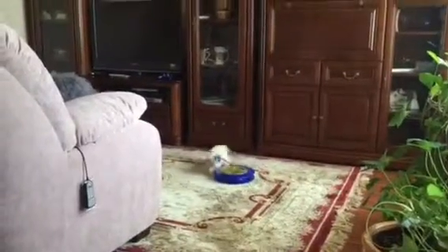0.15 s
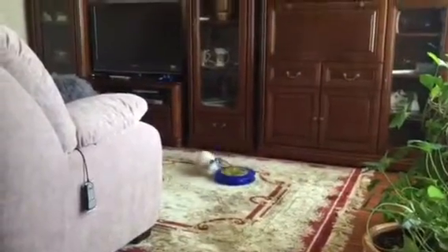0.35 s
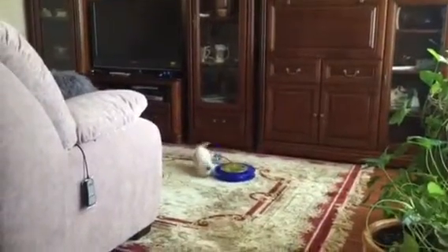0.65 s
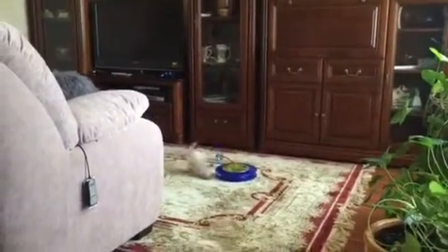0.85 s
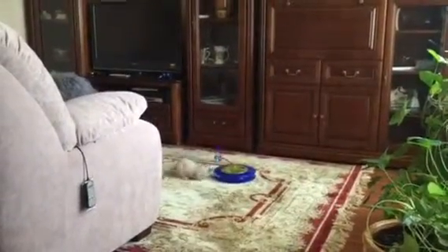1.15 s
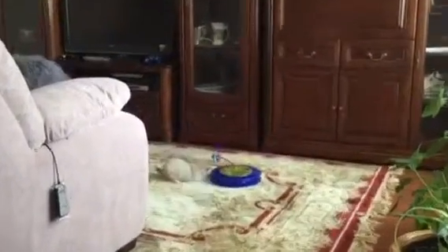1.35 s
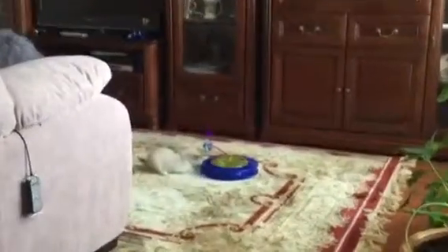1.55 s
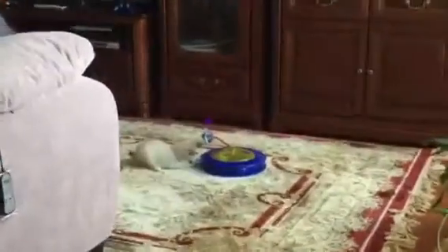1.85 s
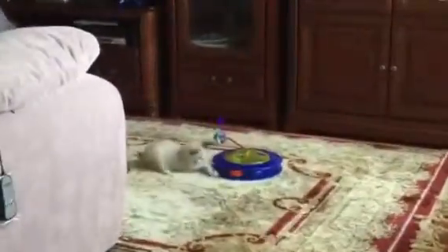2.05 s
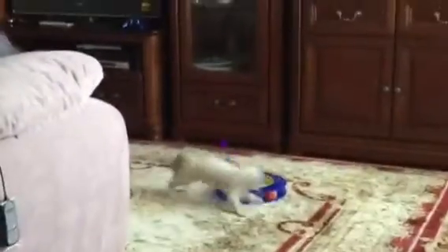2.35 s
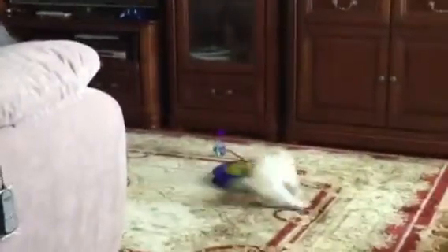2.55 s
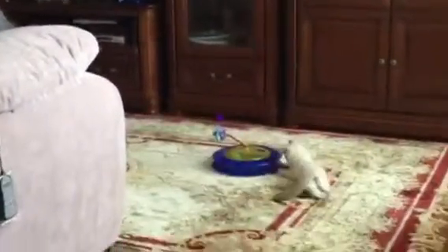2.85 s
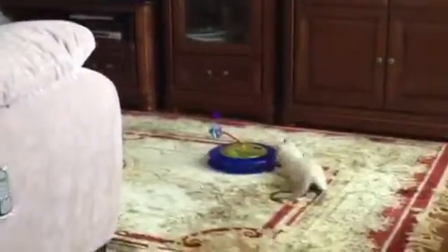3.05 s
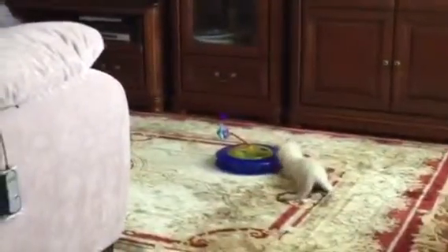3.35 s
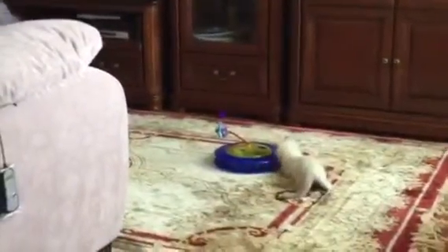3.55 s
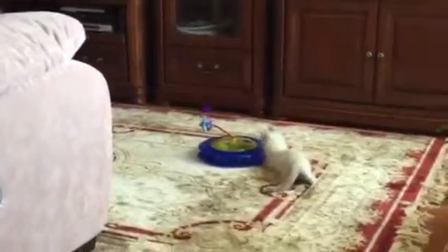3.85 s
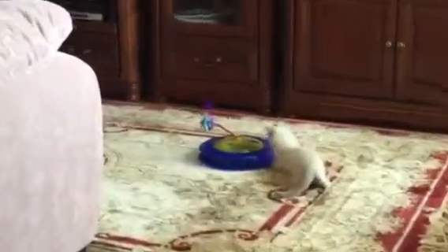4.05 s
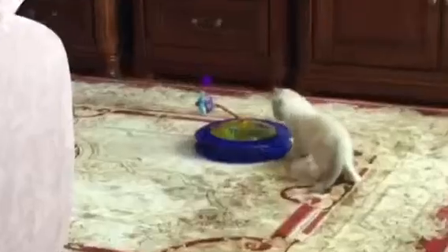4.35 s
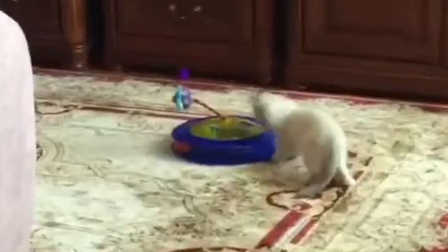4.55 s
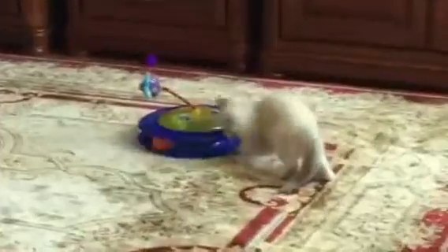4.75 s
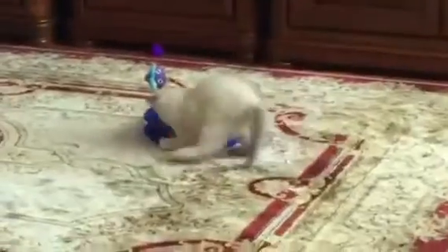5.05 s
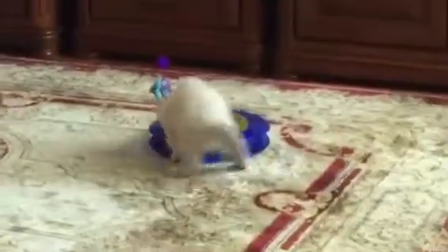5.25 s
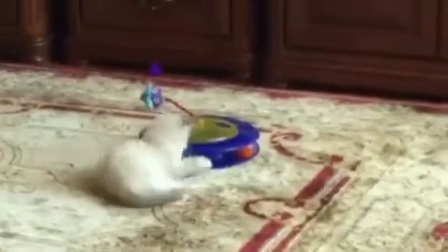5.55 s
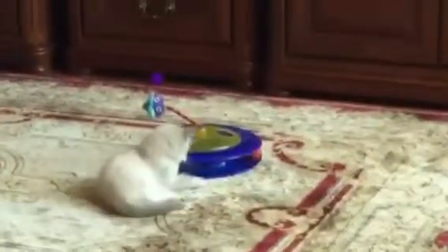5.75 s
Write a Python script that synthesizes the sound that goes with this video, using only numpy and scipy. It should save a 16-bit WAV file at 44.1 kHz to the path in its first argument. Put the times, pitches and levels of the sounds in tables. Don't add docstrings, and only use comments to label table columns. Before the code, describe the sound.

A kitten bats a hollow plastic ball-track toy on a rug in a furnished living room, heard from a few metres away on a phone. Faint rolling and rubbing open the scene, then a claw tick and the loudest, ringing clack at about 0.3 s. A soft bump and scuff follow at 0.7-0.8 s, a clear hollow knock at 1.5 s, a weaker one at 1.9 s, and a small cluster around 2.15 s. Light rolling leads to a strong, lower knock with a thud and short rough scrape at 2.85 s. Claw clicks and a small knock come near 3.4 s, then quiet ball taps and rolling until a modest knock at 5.1 s. A denser clatter with dragging runs from 5.45 to 5.7 s, then fades. Each blow is short and dry-plastic, with about a third of a second of room ring over low hum and soft hiss.

```python
import sys
import numpy as np
from scipy import signal
from scipy.fft import rfft, irfft, next_fast_len
from scipy.io import wavfile
from scipy.ndimage import uniform_filter1d

SR = 44100
rng = np.random.default_rng(int(sys.argv[2]) if len(sys.argv) > 2 else 0)


def store_pcm(level_fs):
    pcm = np.round(np.clip(level_fs, -1, 1) * 32767).astype(np.int16)
    wavfile.write(sys.argv[1], SR, np.atleast_2d(pcm).T)


def undo_db(level):
    steps = np.asarray(level, float) / 20
    return 10 ** steps


N = 259749

# mode_hz [Hz], level_db [dB], t60_s [s]
BODY = [(558.6, -0.5, 0.073), (642.8, 1.5, 0.043), (685, 1, 0.028), (843, -1, 0.03), (937, 0, 0.042),
        (1050, 1, 0.044), (1140, -6, 0.036)]
# mode_hz [Hz], level_db [dB], t60_s [s]
WALL = [(1249, -9.5, 0.091), (1379, 0, 0.018), (1634, -4, 0.017), (1861, -9.5, 0.057), (1947, -4.5, 0.024),
        (2052, -1.5, 0.011)]
# mode_hz [Hz], level_db [dB], t60_s [s]
SHELL = [(2413, 2.5, 0.029), (2640, -1, 0.035), (2934, -6, 0.026), (3120, -3, 0.052), (3437, -3, 0.084),
         (4054, 1.5, 0.0074), (4050, -2, 0.012), (4350, -9.5, 0.0042)]


def level(x, db):
    return x * undo_db(db) / np.sqrt(np.mean(x ** 2))


def shaped(gain_of_hz, size=N):
    fast = next_fast_len(size)
    hz = np.arange(fast // 2 + 1) * SR / fast + 1e-3
    spectrum = rfft(rng.standard_normal(fast)) * gain_of_hz(hz)
    return irfft(spectrum, fast)[:size]


def walk(rate_hz):
    hold = int(SR / rate_hz)
    steps = np.repeat(rng.standard_normal(N // 50)[:N // hold + 1], hold)
    return 1.3 * uniform_filter1d(uniform_filter1d(steps, hold), hold)[:N]


def add(out, start_s, y):
    i = int(start_s * SR)
    out[i:i + len(y)] += y[:N - i]


def push(db):
    return 0.0002 * undo_db(-0.3 * (db + 14.5))


def ring(modes, chance, scatter_db, detune, push_s, lean_hz=1000, lean_db=0):
    hz, db, t60 = np.transpose(modes)[:, :, None]
    size, pitch = chance[:len(hz), None], chance[-len(hz):, None]
    octaves_away = np.minimum(abs(np.log2(hz / lean_hz)), 0.7)
    db = db + scatter_db * size - lean_db * octaves_away
    t = np.arange(SR // 12) / SR
    sign = (-1) ** np.arange(len(hz))[:, None]
    decay = np.exp(-np.log(1000) * t / t60)
    tones = np.sin(2 * np.pi * hz * (1 + detune * pitch) * t)
    y = (sign * undo_db(db) * decay * tones).sum(0)
    y *= 1 - np.exp(-(t / push_s) ** 2)
    return y / abs(y).max()


def crack(noise, hz, width, t60, snap):
    edges = np.clip([hz / (1 + width), hz * (1 + width)], 1000, 15000)
    burst = noise * np.exp(-np.log(1000) * np.arange(len(noise)) / SR / t60)
    burst[0] = snap
    y = signal.sosfilt(signal.butter(3, edges, "bandpass", fs=SR, output="sos"), burst)
    return y / abs(y).max()


def spell(start_s, length_s):
    fade_in_s, fade_out_s = 0.012, 0.04
    t = np.arange(N) / SR - start_s
    share = np.clip(t / length_s, 0, 1)
    edges = np.minimum(t / fade_in_s + 0.5, (length_s - t) / fade_out_s + 0.5)
    return share, np.clip(edges, 0, 1) ** 2


def air():
    # freq_hz [Hz], density_db [dB per Hz]
    hiss_curve = [(18, -43.5), (30, -12), (102, -3), (167, -4.5), (213, -6), (467, -12.5), (1370, -22.5),
                  (1510, -25.5), (2130, -23.5), (9290, -33), (10500, -31), (13600, -66), (22000, -120)]
    # centre_hz [Hz], width_hz [Hz], level_db [dB]
    hum_bands = [(49.8, 17, -73), (98.8, 23, -70), (130.6, 19, -69.5), (215, 6.2, -74),
                 (283.4, 13.4, -78.5), (1497, 44, -83.5)]
    hz, db = np.transpose(hiss_curve)
    wide = level(shaped(lambda h: undo_db(np.interp(np.log(h), np.log(hz), db))), -65.0)
    out = wide * undo_db(0.6 * walk(2.15))
    for centre_hz, width_hz, level_db in hum_bands:
        hum = shaped(lambda h: 1 / (1 + ((h - centre_hz) / width_hz * 2) ** 2))
        out += level(hum, level_db) * undo_db(2.0 * walk(4.7))
    return out


def room():
    # freq_hz [Hz], t60_s [s]
    decay_times = [(200, 0.43), (500, 0.28), (1000, 0.31), (2800, 0.32), (7000, 0.28), (10000, 0.26)]
    # delay_s [s], level_db [dB]
    bounces = [(.0024, -12), (.0083, -5.5), (.0115, -12.5), (0.015, -13), (0.02, -15)]
    tail_db, tail_rise_s = -27.5, 0.0019
    near_db, near_s = 1.5, 0.023
    size = SR // 2
    t = np.arange(size) / SR
    hz, t60 = np.transpose(decay_times)
    tail = np.zeros(size)
    for f in 100 * 2 ** np.arange(0, 7.5, 0.5):
        band = shaped(lambda h: np.cos(np.pi * np.clip(np.log2(h / f), -0.5, 0.5)), size)
        tail += band * np.exp(-np.log(1000) * t / np.interp(np.log(f), np.log(hz), t60))
    answer = undo_db(tail_db) * tail * (1 - np.exp(-(t / tail_rise_s) ** 2))
    answer *= undo_db(near_db * np.exp(-(t / near_s) ** 4))
    answer[0] = 1
    for delay_s, level_db in bounces:
        answer[int(delay_s * SR)] += undo_db(level_db)
    return answer


def drags():
    # start_s [s], length_s [s], hiss_db [dB], rumble_db [dB]
    slides = [(0.005, 0.079, -64.5, -51), (0.147, 0.13, -61, -60), (0.716, 0.04, -65, -60),
              (0.782, 0.079, -54.5, -49.5), (2.113, 0.044, -65.5, -51), (2.266, 0.081, -60, -49.5),
              (2.345, 0.34, -64, -67), (2.72, 0.17, -63, -62), (2.864, 0.062, -40, -45),
              (3.386, 0.1, -52, -58), (3.59, .11, -72, -60), (3.8, 0.355, -86, -67), (4.478, .09, -82, -63),
              (5.019, 0.066, -68, -52.5), (5.452, 0.12, -43.5, -54), (5.58, 0.068, -50, -47),
              (5.646, 0.092, -79, -53.5), (5.82, 0.12, -82, -76)]
    hiss_gain, rumble_gain = np.zeros(N), np.zeros(N)
    for start_s, length_s, hiss_db, rumble_db in slides:
        _, gate = spell(start_s, length_s)
        hiss_gain += gate * undo_db(hiss_db)
        rumble_gain += gate * undo_db(rumble_db)
    hiss = shaped(lambda hz: 1 / (1 + (2500 / hz) ** 4) / (1 + hz / 6000)) * undo_db(2.5 * walk(60))
    rumble = shaped(lambda hz: 1 / (1 + ((hz - 240) / 90) ** 2)) * undo_db(3.9 * walk(25))
    return hiss_gain * level(hiss, -17.5) + rumble_gain * level(rumble, -6.5)


def rolls():
    # start_s [s], length_s [s], push_db [dB], change_db [dB gained or lost by the end]
    runs = [(0.005, 0.098, -45.5, -36), (0.15, 0.21, -64.5, 12), (0.722, .04, -55.5, -2),
            (0.782, 0.093, -57.5, -2), (2.118, 0.048, -53.5, 20.5), (2.306, .32, -65.5, 3.5),
            (2.616, 0.069, -56, -20), (2.74, 0.15, -65.5, 23), (2.885, 0.092, -38, -40),
            (3.52, .17, -70.5, 22), (3.7, .16, -68.5, -1), (3.965, 0.33, -69, -5), (4.41, 0.21, -68.5, 1),
            (4.66, 0.25, -59.5, -25), (5.008, .08, -52, -3), (5.482, 0.14, -37.5, -34),
            (5.58, 0.12, -49, -19), (5.824, 0.098, -61, -5)]
    spots_hz = [850, 960, 1120, 1300, 1600]
    gain = np.zeros(N)
    for start_s, length_s, push_db, change_db in runs:
        share, gate = spell(start_s, length_s)
        gain += gate * undo_db(push_db + change_db * share)
    bumps = (rng.random(N) < 260 / SR) * undo_db(1.1 * rng.exponential(size=N)) * rng.standard_normal(N)
    place = rng.integers(len(spots_hz), size=N)
    roll = np.zeros(N)
    for k, hz in enumerate(spots_hz):
        bump_ring = ring([*BODY, *WALL], rng.standard_normal(32), 0.75, 0.016, 0.00015, hz, 31.0)
        roll += signal.fftconvolve(bumps * (place == k), bump_ring)[:N]
    return gain * level(roll, -5.0)


def thumps():
    # start_s [s], peak_db [dB], favoured_hz [Hz]
    landings = [(0.282, -34.5, 363), (0.734, -49.5, 363), (0.793, -42, 197), (0.845, -55, 215),
                (1.512, -38.5, 383), (1.911, -45, 369.3), (2.149, -41.5, 337), (2.838, -32, 270),
                (2.891, -44.5, 215), (3.437, -44, 420), (3.666, -52, 278), (4.763, -63, 352),
                (5.097, -46.5, 363), (5.47, -38, 354), (5.516, -40, 446), (5.593, -42.5, 198),
                (5.631, -43, 215), (5.701, -61, 226)]
    # mode_hz [Hz], level_db [dB], t60_s [s]
    thud_modes = [(209.4, -4.5, 0.14), (303, -1, 0.07), (360, -6.5, 0.023), (405.5, 5, 0.028)]
    out = np.zeros(N)
    for start_s, peak_db, hz in landings:
        thud = ring(thud_modes, rng.standard_normal(16), 0.64, 0.02, 0.0039, hz, 28.0)
        add(out, start_s, undo_db(peak_db - 2.5) * thud)
    return out


def ticks():
    # start_s [s], peak_db [dB], centre_hz [Hz]
    claws = [(0.0817, -56, 7430), (0.2586, -27.5, 7500), (1.471, -37, 7200), (1.8536, -54, 8420),
             (2.045, -45, 9100), (2.5476, -55, 9600), (2.814, -41, 7950), (3.3386, -38, 8500),
             (3.3852, -30, 5200), (4.6467, -50, 7740), (5.5447, -38.5, 6300)]
    out = np.zeros(N)
    for start_s, peak_db, hz in claws:
        add(out, start_s, undo_db(peak_db - 1.0) * crack(rng.standard_normal(512), hz, 0.34, 0.017, 12.0))
    return out


def pings():
    # start_s [s], peak_db [dB], panel_hz [Hz]
    panel_blows = [(0.278, -20, 1660), (0.278, -36, 3060), (1.513, -34, 3150), (1.912, -51, 3720),
                   (2.174, -70, 3530), (2.357, -67, 3550), (2.5, -56, 1600), (2.628, -79, 2420),
                   (2.841, -33, 2540), (2.841, -29, 1480), (2.927, -52.5, 3500), (3.386, -39, 2970),
                   (3.44, -62, 1810), (5.101, -57, 2640), (5.101, -56.5, 3080), (5.101, -48.5, 1760),
                   (5.321, -61, 1620), (5.464, -32.5, 632), (5.464, -46, 3508), (5.543, -49, 2380),
                   (3.386, -44.5, 2080), (0.278, -24, 816), (0.315, -30, 937), (0.197, -54.5, 1140),
                   (0.278, -32, 2052), (5.464, -37.5, 937)]
    out = np.zeros(N)
    for start_s, peak_db, hz in panel_blows:
        chance = rng.standard_normal(44)
        ping = ring([*BODY, *WALL, *SHELL], chance, 1.16, 0.0097, 0.87 * push(peak_db), hz, 78.0)
        add(out, start_s + 0.00033, undo_db(peak_db) * ping)
    return out


def knocks():
    # start_s [s], peak_db [dB], favoured_hz [Hz], hard_db [dB rel], wall_db [dB rel]
    swats = [(0.278, -19.5, 850, -10.5, -9), (0.736, -40, 680, -25.5, -12.5),
             (1.513, -21.5, 880, -18.5, -9.5), (1.912, -30.5, 870, -17.5, -10.5),
             (2.139, -37.5, 1090, -20.5, -8.5), (2.153, -46.5, 1060, -12.5, -8),
             (2.174, -33, 960, -22.5, -7.5), (2.839, -21, 616, -16.5, -22), (2.884, -44.5, 660, -6, 9.5),
             (2.927, -33.5, 1020, -16.5, -8), (3.384, -46.5, 724, 4.5, 1.5), (3.436, -39, 730, -26, -6.5),
             (5.101, -32.5, 960, -35.5, -20), (5.464, -28, 930, -16.5, -5), (5.509, -29.5, 540, -24, -10),
             (5.543, -47, 961, -8.5, -17), (5.586, -39.5, 876, -8.5, 2), (5.599, -41.5, 540, -28, -7),
             (5.623, -34, 860, -18, -6), (5.677, -55, 844, -28, -9), (5.705, -48.5, 1010, -13, -4.5)]
    # start_s [s], peak_db [dB], favoured_hz [Hz], hard_db [dB rel]
    taps = [(0.041, -49, 1140, -33.5), (0.094, -49, 1140, -22.5), (0.162, -51.5, 760, -22),
            (0.195, -53, 1140, -18), (0.67, -51, 570, -52), (2.225, -40, 1050, -52),
            (2.313, -52, 1050, -44), (2.356, -43, 1100, -22.5), (2.628, -45, 930, -23),
            (2.797, -58, 1140, -10), (3.338, -52, 1120, -16), (3.609, -47.5, 1050, -26),
            (3.659, -39.5, 1145, -27), (3.833, -62, 1044, -33), (4.015, -53.5, 1083, -32),
            (4.088, -44.5, 1170, -59), (4.149, -49.5, 1050, -36), (4.505, -62, 1140, -27),
            (4.573, -63.5, 1140, -18), (4.647, -41, 875, -28), (4.839, -59.5, 544, -30),
            (4.923, -54, 550, -23), (5.017, -42, 870, -41), (5.319, -44, 840, -27), (5.87, -52, 830, -22)]
    blows = [*swats, *[(*tap, -9 + 0.13 * (tap[3] + 24)) for tap in taps]]
    out = np.zeros(N)
    for start_s, peak_db, hz, hard_db, wall_db in blows:
        chance = rng.standard_normal((4, 20))
        noise = rng.standard_normal(512)
        lean_db = np.clip(14.5 - 0.087 * (peak_db + 33.0), 3, 36)
        wall_hz = 1494 * 2 ** (0.13 * chance[3, 0])
        shell_hz = 2780 * 2 ** (0.067 * chance[3, 1])
        wall_push_s = push(peak_db + wall_db)
        blow = ring(BODY, chance[0], 2.8, 0.014, push(peak_db), hz, lean_db)
        blow += undo_db(wall_db) * ring(WALL, chance[1], 1.6, 0.019, 0.55 * wall_push_s, wall_hz, 14)
        shell = ring(SHELL, chance[2], 1.5, 0.0083, 0.45 * wall_push_s, shell_hz, 6.9)
        blow += undo_db(hard_db + 2.5) * shell
        add(blow, 0, undo_db(1.148 * hard_db + 14.0) * crack(noise, 6560, 0.65, 0.0041, 3.4))
        add(blow, 0, undo_db(hard_db + 9.0) * crack(noise[::-1], 3500, 0.61, 0.016, 3.0))
        add(out, start_s + 0.0003, undo_db(peak_db) * blow)
    return out


def scene():
    background = air()
    moves = rolls() + drags()
    toy = knocks() + pings() + ticks() + thumps() + undo_db(-2.0) * moves
    return (signal.fftconvolve(toy, room())[:N] + background)[None]


def low_pass(x):
    return signal.sosfilt(signal.butter(12, 11340, fs=SR, output="sos"), x)


def record(dry):
    high = signal.butter(2, 43, "highpass", fs=SR, output="sos")
    low = signal.cheby1(8, 0.5, 9954, fs=SR, output="sos")
    mix = signal.sosfilt(low, signal.sosfilt(high, dry))
    return low_pass(mix)


dry = scene()
out = record(dry)
store_pcm(out)
```